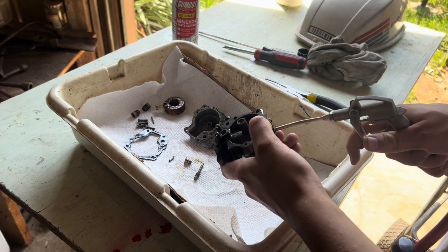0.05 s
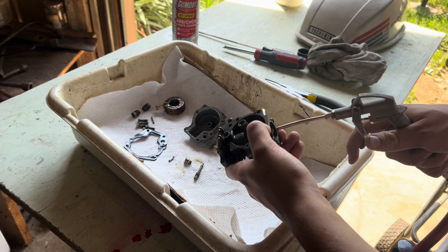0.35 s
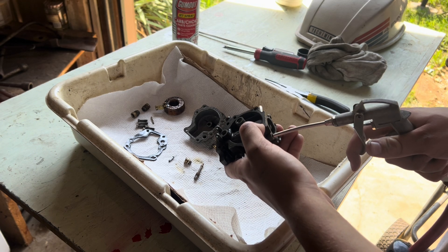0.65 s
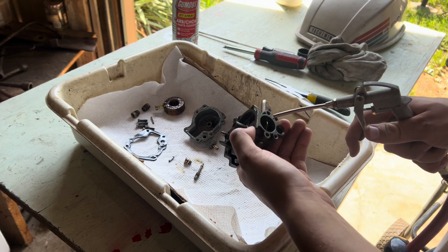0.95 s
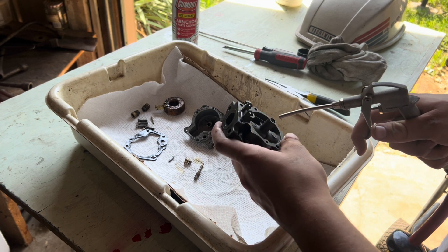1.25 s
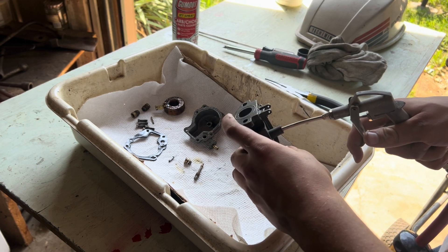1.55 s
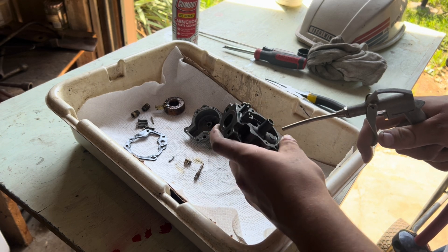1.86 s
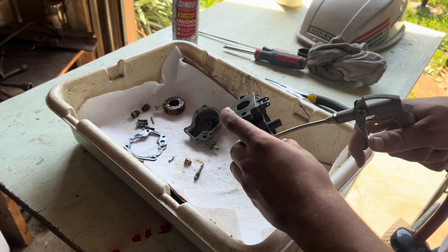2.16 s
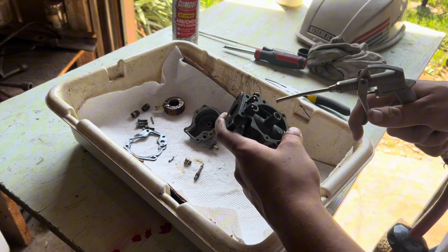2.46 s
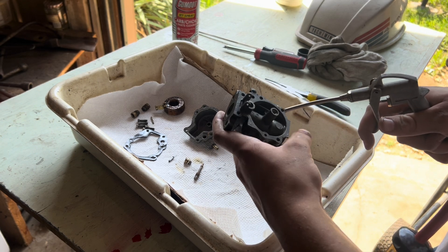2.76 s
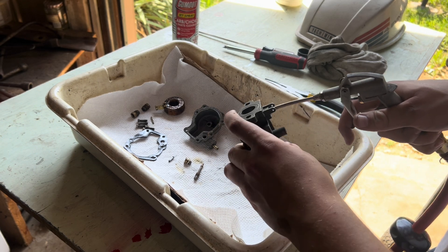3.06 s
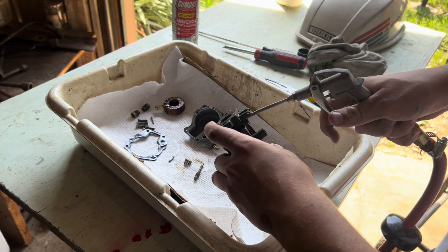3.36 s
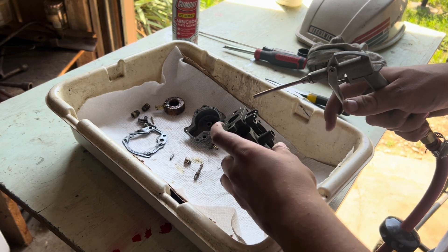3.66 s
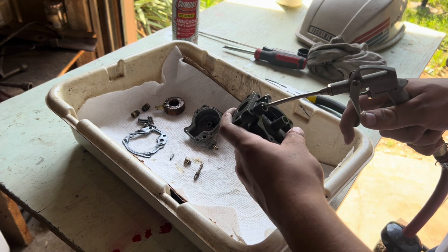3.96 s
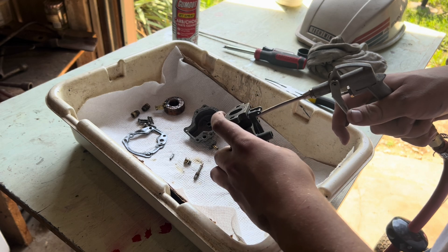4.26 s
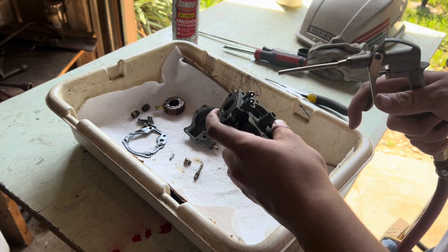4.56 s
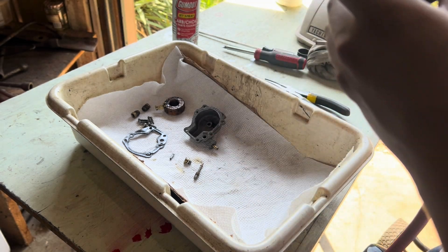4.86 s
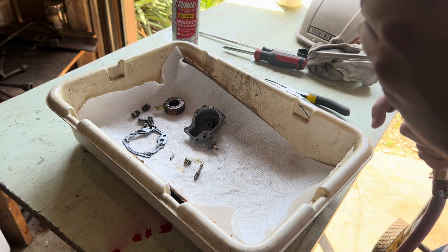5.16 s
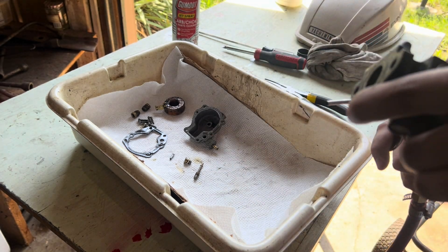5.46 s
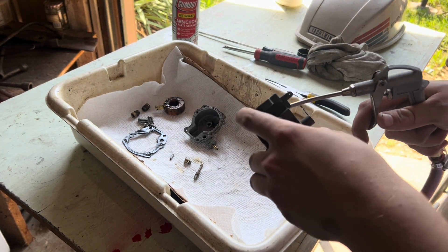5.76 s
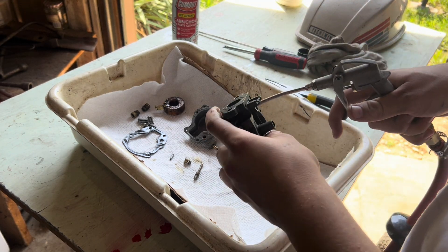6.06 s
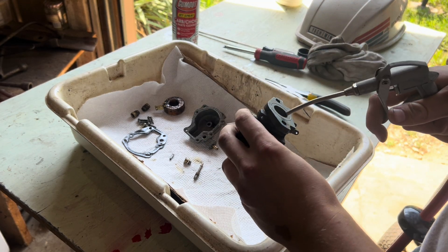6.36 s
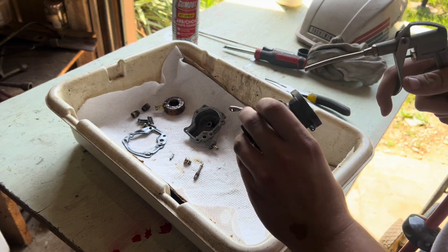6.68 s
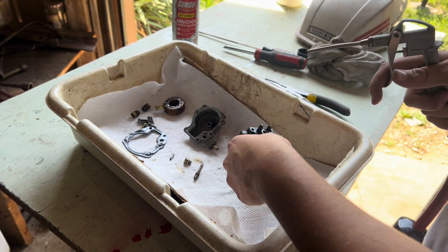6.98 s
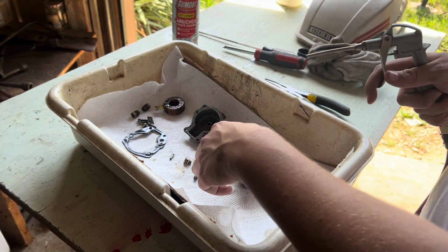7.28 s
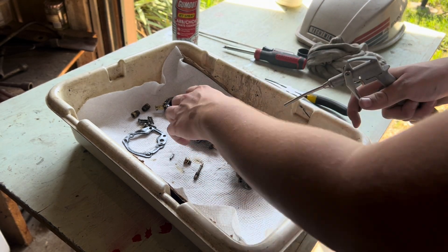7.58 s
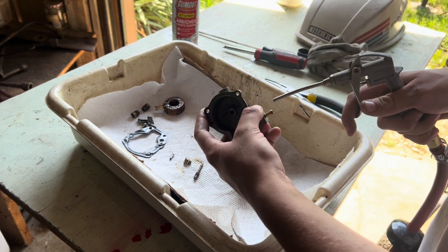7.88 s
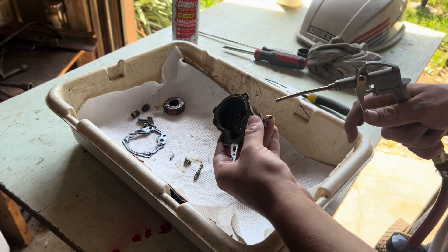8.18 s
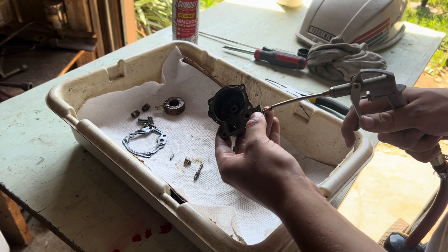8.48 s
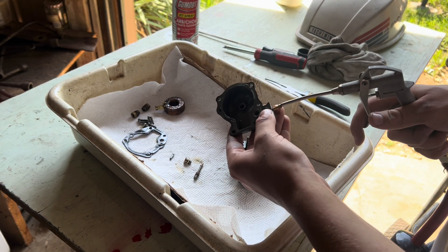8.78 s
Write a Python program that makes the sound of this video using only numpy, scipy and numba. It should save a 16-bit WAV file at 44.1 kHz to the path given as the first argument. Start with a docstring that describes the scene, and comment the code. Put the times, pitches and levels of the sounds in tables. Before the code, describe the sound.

An air blow gun fires quick, hissing bursts into a carburettor in a small workshop, over faint distant traffic.

```python
"""Short, sharp blasts of hiss: a blow gun fires compressed air into a carburettor over a plastic tray.
The turbulent jet excites the resonances of the part's bores in an open workshop; deflected air buffets
the microphone, whose gain control ducks each blast. In between, the valve seeps and the part ticks
under nozzle and fingers, while a vehicle passes beyond the door over distant traffic."""
import sys
import numpy as np
from scipy import signal
from scipy.fft import rfft, irfft, next_fast_len
from scipy.io import wavfile
from scipy.ndimage import uniform_filter1d
from numba import njit

SR = 44100
rng = np.random.default_rng(int(sys.argv[2]) if len(sys.argv) > 2 else 0)


def file_out(sig):
    """Save sig as 16-bit WAV at sys.argv[1]."""
    # one column per channel
    cols = np.atleast_2d(sig).T
    # limit, then scale
    lim = np.clip(cols, -1, 1)
    pcm = np.round(lim * 32767).astype(np.int16)
    wavfile.write(sys.argv[1], SR, pcm)


N = 389403
TIME = np.arange(N) / SR
# spectrum of the bright hiss as heard, with two notches in the treble: (frequency [Hz], level [dB])
HISS_SPECTRUM = [(150, -11), (700, -12), (1500, -8.5), (3000, -4.5), (5000, -6.5), (7000, -3.5), (9100, 1),
                 (10300, -7.5), (11200, -5.5), (12000, -10), (13000, -11.5), (14000, -25), (15000, -11),
                 (15700, -10.5), (16500, -50.5)]


def blasts(flutter_db=2.33, flutter_hz=330, bore_q=1.4, core_share=.14):
    """Turbulent mixing makes broadband noise, filtered by the bore and edge that the jet strikes."""
    # trigger pulls: (opening [s], closing [s], level [dB], tilt [dB/kHz])
    pulls = [(0.013, 0.049, -9, 1.82), (0.096, 0.133, -8, 1.54), (0.162, 0.2, -10, 1.3),
             (0.774, 0.793, -2.5, 0.7), (1.498, 1.527, -2.3, 0.5), (1.586, 1.614, -0.7, 0.58),
             (1.64, 1.676, -1.4, 0.62), (1.702, 1.74, -1.5, 0.77), (2.155, 2.186, -0.1, 0.7),
             (2.223, 2.26, -2.3, 0.63), (2.289, 2.321, -2.3, 0.54), (3.141, 3.15, -13.5, 0),
             (3.174, 3.193, 1, 1.02), (3.251, 3.283, -1, 0.6), (3.311, 3.341, 0.1, 0.6),
             (3.368, 3.395, 1.5, 0.7), (3.422, 3.45, 2, 0.64), (3.475, 3.506, -0.9, 0.73),
             (3.533, 3.569, -1.2, 0.93), (3.594, 3.633, -5, 1.1), (4.091, 4.121, -2.4, 1.08),
             (4.164, 4.205, -7, 0.78), (4.243, 4.45, -1.6, 0.52), (5.911, 5.94, -4.5, 0.47),
             (5.973, 6.003, -1.9, 0.55), (6.37, 6.405, -0.5, 0.7), (6.486, 6.516, -0.8, 0.8),
             (6.547, 6.589, -5, 0.73), (7.395, 7.434, -0.8, 0.4), (8.627, 8.635, -7.4, 1.76),
             (8.748, 8.767, -3, 1)]
    # resonances under the jet: (from [s], bore [Hz], boost [dB], edge [Hz], boost [dB])
    aims = [(0, 2020, 14, 3870, 1.5), (.7, 1700, 7, 4280, 5), (1.4, 3060, 17, 10020, 8.5),
            (2.1, 3100, 8, 7710, 9), (3, 2050, 7.5, 6870, 11), (3.16, 3700, 4.5, 6780, 8.5),
            (3.3, 1500, 3, 6880, 1), (3.46, 3650, 3, 7300, 2), (4, 1500, 3, 7270, 1.5),
            (4.23, 3700, 0.5, 8900, 6), (5.8, 1520, 9, 6890, 1.5), (6.3, 2840, 12, 9200, 2),
            (6.53, 2980, 17, 6580, 1), (7.3, 3290, 7.5, 5410, 11), (8.5, 3450, 6, 6710, 7)]
    open_s, shut_s = .004, .0045
    surge_db, surge_s = .5, .004  # pressure stored in the hose
    onset_db, onset_s = -27.5, .0072  # a faint hiss swells just before each blast, softening its onset
    out = np.zeros((2, N))
    for start, stop, db, tilt in pulls:
        _, bore_hz, bore_db, edge_hz, edge_db = [aim for aim in aims if aim[0] <= start][-1]
        def colour(hz):
            hump = (1 - core_share) * bump(hz, bore_hz, bore_hz / bore_q)
            core = core_share * bump(hz, bore_hz, 200)
            part_db = bore_db * (hump + core) + edge_db * bump(hz, edge_hz, 2500)
            hiss_db = spectrum(HISS_SPECTRUM, hz) + tilt * hz / 1000
            return undb(hiss_db + part_db) * ports(hz) * near_echoes(hz)
        t = np.arange(SR // 3) / SR - min(.02, start)
        surge = undb(surge_db * np.exp(-np.abs(t) / surge_s))
        envelope = valve(t + open_s / 2, stop - start, open_s, shut_s) * surge
        envelope += undb(onset_db) * np.exp(-np.abs(t) / onset_s) * (t < 0)
        jet = noise(len(t), colour, apart=.33)
        add(out, start + t[0], jet * envelope * undb(db + flutter_db * walk(len(t), flutter_hz)))
    return out


def near_echoes(hz, db=-17.5, longest_s=.0025, spread_s=.00002, count=5):
    """Comb filtering: reflections from hands, part and tray interfere with the direct sound."""
    lag = rng.uniform(.1, 1, (count, 1, 1)) * longest_s + spread_s * rng.standard_normal((count, 2, 1))
    polarity = rng.choice([-1, 1], (count, 1, 1))
    return 1 + undb(db) * np.sum(polarity * np.exp(-2j * np.pi * hz * lag), axis=0)


def ports(hz):
    """Phase difference of the jet's sound between the two microphone ports."""
    # lead of the left port: (frequency [Hz], phase [rad])
    phase_lead = [(20, 0), (1900, 0), (3000, .9), (5300, 1), (8200, .4), (9300, -1.4), (9900, -2.8),
                  (10600, -3.45), (11700, -6), (12800, -6.8), (13500, -9.2), (14300, -9.7), (15000, -12.3)]
    return np.exp(.5j * spectrum(phase_lead, hz) * np.array([[1], [-1]]))


def whistle(start=6.587, hz=2960, db=-4, ring_db=-21, ring_s=.012):
    """Pipe resonance: the jet crosses the mouth of a bore, which sounds for an instant and rings on."""
    t = np.arange(SR // 7) / SR
    pitch = hz * (1 + .025 * walk(len(t), 140))
    tone = np.sin(2 * np.pi * np.cumsum(pitch) / SR)
    envelope = valve(t, .006, rise_s=.002, fall_s=.003) + undb(ring_db) * np.exp(-t / ring_s)
    out = np.zeros((2, N))
    add(out, start, undb(db + np.array([[-3], [3]])) * envelope * tone)
    return out


def buffeting(rumble_db=-3, wake_db=-15, fast_hz=220, firm_db=-17):
    """Turbulent pressure on the microphone: vortex slaps over a rumble, sharp pops and a deep wake."""
    # deflected air: (start [s], end [s], level [dB], eddy frequency [Hz])
    gusts = [(0.021, 0.045, -21, 126.7), (0.098, .13, -27, 150.7), (3.15, 3.205, -19, 70.8),
             (3.275, 3.289, 7, 64.5), (3.316, 3.339, 6.5, 134.6), (3.371, 3.396, -8, 214),
             (3.424, 3.45, -6.5, 230), (3.476, 3.505, -11, 278.5), (3.538, 3.575, -15.5, 271.8),
             (3.598, 3.634, -24, 250.5), (4.113, 4.121, -13.5, 264), (4.257, 4.37, -14, 225),
             (4.413, 4.44, -10.5, 220.6), (5.915, 5.943, 6.5, 135.6), (5.974, 6.003, 6.5, 149.5),
             (6.383, 6.406, 4, 149.6), (6.417, 6.437, 1.5, 40.7), (6.482, 6.518, -10, 218),
             (6.529, 6.573, -12, 48), (8.755, 8.77, 4.5, 190)]
    out, left = np.zeros((2, N)), np.array([[1], [-1]])
    t = np.arange(SR // 4) / SR
    for start, stop, db, eddy_hz in gusts:
        length = max(stop - start, .005)
        rumble = noise(len(t), lambda hz: hz / (hz + 45) / (1 + (hz / (.96 * eddy_hz)) ** 2.4), .45)
        slaps = unit(eddies(t, eddy_hz, per_s=1.5 * eddy_hz, until_s=t[-1]))
        wind = (undb(rumble_db) * rumble + slaps) * valve(t, length, rise_s=.00075, fall_s=.0019)
        wind = unit(wind) * np.sqrt(length / t[-1])  # rms near 1 while the gust lasts
        wake = noise(len(t), lambda hz: bump(hz, 45, 45) ** 2, apart=.1)
        wake *= valve(t, length, rise_s=length, fall_s=.03)
        # fast, firm gusts pop most, more so on the left port
        pop_db = 8 + .1 * db + 2 * min(db - firm_db, 0) + 2 * left
        pop_gain = undb(pop_db) * min(eddy_hz / fast_hz, 1) ** 2
        pops = eddies(t, eddy_hz=289.7, per_s=50, until_s=length, smallest=.28, front=7.5)
        add(out, start, undb(db) * (wind + undb(wake_db) * wake) + pop_gain * pops)
    return out * undb(.6 * left)


def eddies(t, eddy_hz, per_s, until_s, smallest=.4, front=5, count=64):
    """Superposed pressure pulses from an uneven train of vortices of either sign."""
    late, sign, size = rng.random((count, 3)).T
    when = (np.arange(count) + late) / per_s
    sizes = np.sign(sign - .5) * (smallest + (1 - smallest) * size)
    hits = np.histogram(when, len(t), (0, t[-1]), weights=sizes * (when < until_s))[0]
    return signal.fftconvolve(hits, slap(t, eddy_hz, front))[:len(t)]


def slap(t, eddy_hz, front, glide_s=.0011, cycles=.8):
    """A vortex striking the port is a damped oscillation whose pitch falls at once to a thud."""
    turns = eddy_hz * (t + front * glide_s * (1 - np.exp(-t / glide_s)))
    return np.sin(2 * np.pi * turns) * np.exp(-t * eddy_hz / cycles) * (1 - np.exp(-12 * eddy_hz * t))


def seepage(steady_db=-72, flicker_db=4.24, waver_db=3, jet_db=-2):
    """A thread of air excites the modes of the nozzle tube; a wider leak adds jet noise."""
    # tube modes: (frequency [Hz], nominal width [Hz], level [dB])
    modes = [(3460, 400, -8), (4440, 300, -5.5), (5390, 300, -1.5), (6890, 400, -0.5), (7650, 400, 0),
             (9800, 390, -8), (12300, 900, -3.5)]
    # swells of seepage through the shut valve: (peak time [s], half-width [s], level [dB])
    seeps = [(1.2, 0.36, -69), (3.02, .3, -62.5), (5.25, 0.36, -65), (5.72, 0.12, -59.5), (6.2, .12, -62.5),
             (8.5, .2, -61.5)]
    # trigger half squeezed: (start [s], end [s], level [dB])
    leaks = [(1.462, 1.497, -37), (3.098, 3.14, -28), (4.02, 4.09, -62.5), (6.31, 6.368, -39),
             (6.43, 6.487, -34), (6.515, 6.548, -8.5), (8.605, 8.69, -31), (8.69, 8.747, -21),
             (8.76, 8.83, -40)]
    tube = 0
    for centre, width, db in modes:
        mode = noise(N, lambda hz: bump(hz, centre, 1.4 * width), apart=1)
        tube += mode * undb(db + waver_db * walk(N, 12))
    tube = unit(tube)
    jet = noise(N, lambda hz: undb(spectrum(HISS_SPECTRUM, hz)) * ports(hz), apart=.45)
    seep = tube * np.sqrt(undb(steady_db) ** 2 + sum(swell(*row) ** 2 for row in seeps))
    leak = unit(tube + undb(jet_db) * jet) * spells(leaks, rise_s=.014, fall_s=.005)
    return (seep + leak) * undb(flicker_db * walk(N, 40))


def ticks(ring_s=.0013):
    """Light impacts excite a resonance of the metal, damped at once by the hand."""
    # nozzle and fingers touch the part: (time [s], level [dB], resonance [Hz])
    contacts = [(.695, -46.5, 5540), (2.96, -44, 6900), (4.516, -38, 6650), (4.534, -44, 6300),
                (5.375, -47, 7400), (5.656, -50, 7000), (5.712, -52.5, 6250), (7.125, -48.5, 6330)]
    out, t = np.zeros((2, N)), np.arange(SR // 25) / SR
    for start, db, ring_hz in contacts:
        ring = noise(len(t), lambda hz: bump(hz, ring_hz, 2200), apart=.5)
        add(out, start, ring * undb(db) * np.exp(-t / ring_s))
    return out


def workshop(sound, t60_s=.09, tail_db=-21.5, treble_hz=9000, build_s=.029):
    """Reverberation: a small cluttered room adds a short diffuse tail, duller than the direct sound."""
    t = np.arange(SR // 3) / SR
    tail = noise(len(t), lambda hz: 1 / np.sqrt(1 + (hz / treble_hz) ** 4), apart=1.4)
    tail *= undb(-60 * t / t60_s) * (1 - np.exp(-t / build_s))
    tail = unit(tail) / np.sqrt(len(t))
    return sound + undb(tail_db) * signal.fftconvolve(sound, tail, axes=1)[:, :N]


def traffic(far_rumble_db=-46.5, recede_db_per_s=.85, far_tyres_db=-59.5, tread_hz=1080, tread_db=6):
    """Level falls with distance: one vehicle swells and fades over far tyres and a receding rumble."""
    # spectra of traffic rumble and tyre noise: (frequency [Hz], level [dB])
    rumble_bands = [(20, -9.5), (45, -2), (75, 1), (110, -0.5), (160, -8), (260, -14.5), (450, -21.5),
                    (900, -37), (3000, -65)]
    tyre_bands = [(100, -11), (350, -6), (650, -3.5), (1050, -3.5), (1500, -5.5), (2200, -12), (3500, -21),
                  (6000, -28.5), (9000, -35.5), (13000, -54)]
    rumble = noise(N, lambda hz: undb(spectrum(rumble_bands, hz)), apart=.17)
    rumble *= np.hypot(undb(far_rumble_db - recede_db_per_s * TIME), swell(3.32, .41, db=-31))
    rumble *= undb(.44 * walk(N, 9.6))
    far = noise(N, lambda hz: undb(spectrum(tyre_bands, hz)), apart=2)
    near = noise(N, lambda hz: undb(spectrum(tyre_bands, hz) + tread_db * bump(hz, tread_hz, 500)), 3.1)
    tyres = far * undb(far_tyres_db) + near * swell(2.95, .53, db=-44)
    return rumble + tyres * undb(.52 * walk(N, 30))


def drone(centre_hz=104.6):
    """Narrow-band noise is heard as a low pitch that comes and goes."""
    # swells: (peak time [s], half-width [s], level [dB])
    swells = [(.45, .06, -47.5), (.93, .12, -34), (4.0, .18, -39.5)]
    return noise(N, lambda hz: bump(hz, centre_hz, 13), apart=.1) * sum(swell(*row) for row in swells)


def whine(centre_hz=846, waver_db=3):
    """Amplitude modulation makes a faint, narrow band of noise waver."""
    # spells of whine: (start [s], end [s], level [dB])
    spans = [(4.55, 5.63, -60.5), (6.08, 6.38, -52.5), (7.75, 8.2, -68)]
    band = noise(N, lambda hz: bump(hz, centre_hz, 56), apart=.94)
    return band * spells(spans, rise_s=.039, fall_s=.04) * undb(waver_db * walk(N, 9.4))


def still_air(db=-59.5):
    """Stationary noise sets the ambient floor of the workshop."""
    # ambient spectrum: (frequency [Hz], level [dB])
    air_bands = [(100, -3), (400, 0.5), (800, -5), (1600, -5), (3000, -9.5), (5000, -17.5), (9000, -24),
                 (13000, -48)]
    return noise(N, lambda hz: undb(spectrum(air_bands, hz)), apart=.98) * undb(db)


@njit
def gain_control(x, limit_db, slope, attack_s, recover_db_per_s):
    """Feedback compression: gain drops when output power passes the limit, then creeps back."""
    y, power, cut_db = np.empty_like(x), 1e-12, 0.
    for i in range(x.shape[1]):
        gain = 10 ** (-cut_db / 20)
        y[0, i], y[1, i] = gain * x[0, i], gain * x[1, i]
        power += ((y[0, i] ** 2 + y[1, i] ** 2) / 2 + 1e-12 - power) / (attack_s * SR)
        cut_db = max(cut_db - recover_db_per_s / SR, slope * (10 * np.log10(power) - limit_db), 0.)
    return y


def undb(db):
    """Decibels to amplitude ratio."""
    return 10 ** (np.asarray(db) / 20)


def unit(x):
    """Normalise to rms 1."""
    return x / np.sqrt(np.mean(x ** 2) + 1e-18)


def spectrum(points, hz):
    """Interpolate (frequency [Hz], value) points on a logarithmic axis."""
    points = np.array(points)
    return np.interp(np.log(hz + 1), np.log(points[:, 0]), points[:, 1])


def bump(hz, centre, width):
    """Lorentzian resonance with this full width at half height."""
    return 1 / (1 + (2 * (hz - centre) / width) ** 2)


def noise(size, response, apart):
    """Partly coherent stereo noise through response(hz); apart weights what each port hears alone."""
    padded = next_fast_len(size)
    white = rng.standard_normal((3, padded))
    pair = rfft(white[0] + apart * white[1:])
    return unit(irfft(pair * response(np.fft.rfftfreq(padded, 1 / SR)), padded)[:, :size])


def walk(size, rate):
    """Random modulation: ramps between values drawn every 1 / rate s."""
    hold = max(int(SR / rate), 1)
    return uniform_filter1d(np.repeat(rng.standard_normal(size // hold + 1), hold), hold)[:size]


def valve(t, length, rise_s, fall_s):
    """Envelope of linear rise, hold and exponential decay."""
    return np.clip(t / rise_s, 0, 1) * np.exp(-np.maximum(t - length, 0) / fall_s)


def swell(peak_s, half_s, db):
    """Lorentzian envelope, at half amplitude half_s from its peak."""
    return undb(db) / (1 + ((TIME - peak_s) / half_s) ** 2)


def spells(table, rise_s, fall_s):
    """Gating envelope, on during each (start [s], end [s], level [dB]) row."""
    return sum(undb(db) * valve(TIME - start, stop - start, rise_s, fall_s) for start, stop, db in table)


def add(out, start, sound):
    """Superpose a sound from a given time."""
    i = max(int(start * SR), 0)
    part = sound[..., :max(N - i, 0)]
    out[:, i:i + part.shape[-1]] += part


def scene():
    """Superposition: the gun sounds in the room; stray air acts on the microphone itself."""
    air = still_air()
    gun = workshop(blasts() + whistle() + seepage() + ticks())
    return gun + buffeting() + traffic() + drone() + whine() + air


def record(dry):
    """Compression, clipping at full scale and a steep low-pass filter."""
    held = gain_control(dry, limit_db=-18.5, slope=1.18, attack_s=.0044, recover_db_per_s=27.5)
    top_cut = signal.ellip(10, .2, 70, 15850, fs=SR, output="sos")
    return signal.sosfilt(top_cut, np.clip(held, -1, 1))


dry = scene()
out = record(dry)
file_out(out)
```